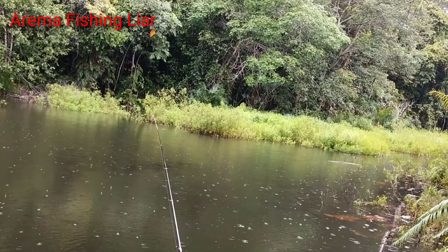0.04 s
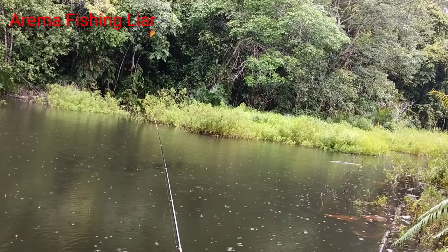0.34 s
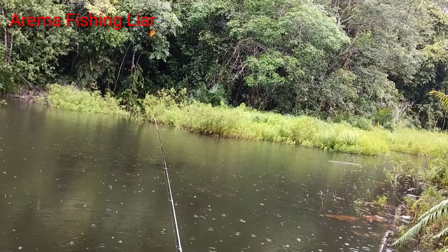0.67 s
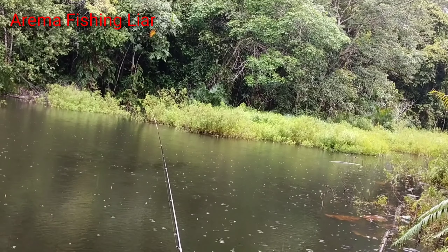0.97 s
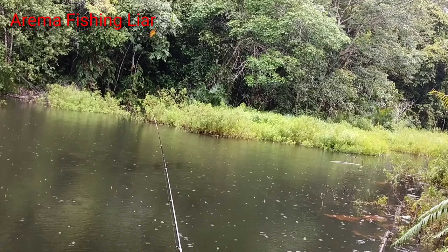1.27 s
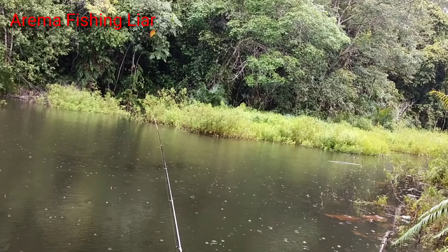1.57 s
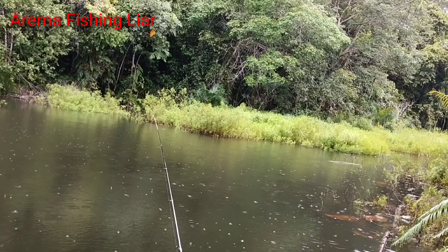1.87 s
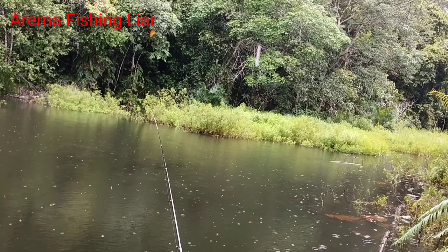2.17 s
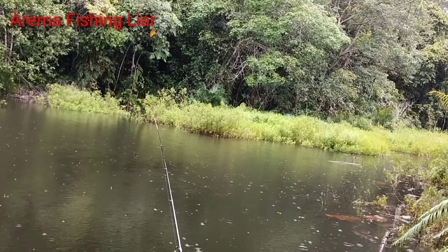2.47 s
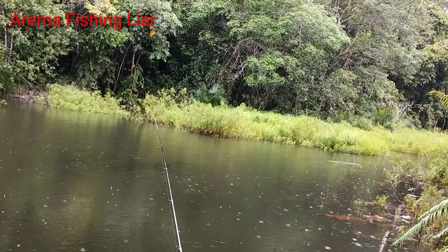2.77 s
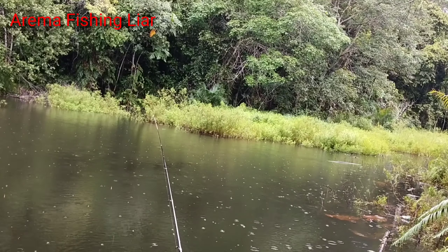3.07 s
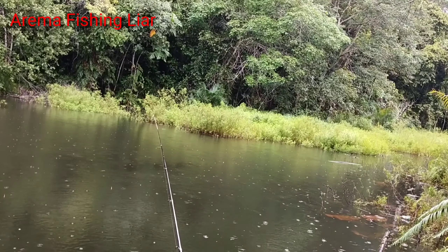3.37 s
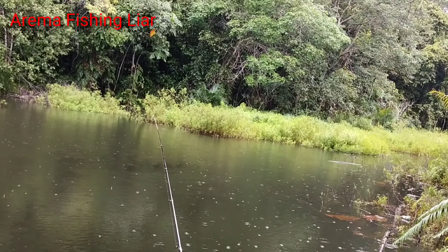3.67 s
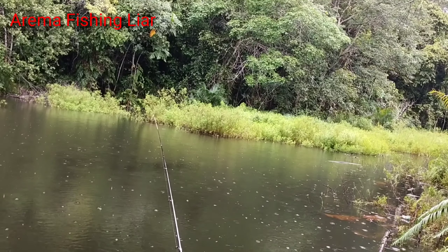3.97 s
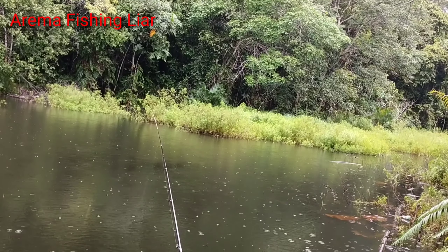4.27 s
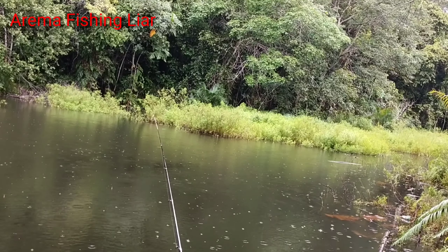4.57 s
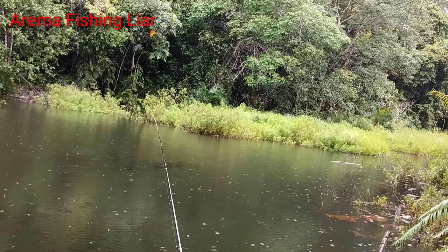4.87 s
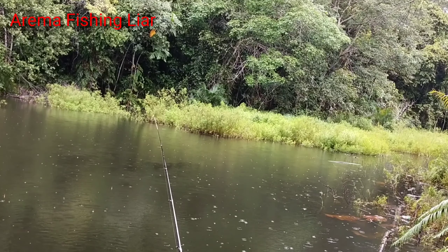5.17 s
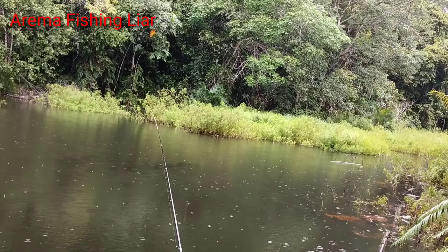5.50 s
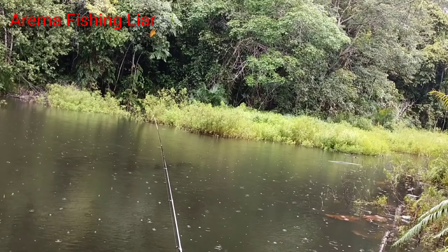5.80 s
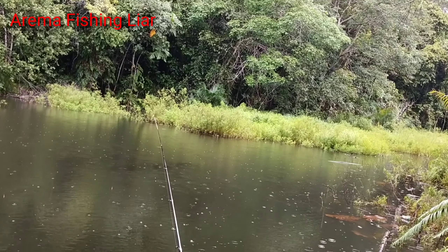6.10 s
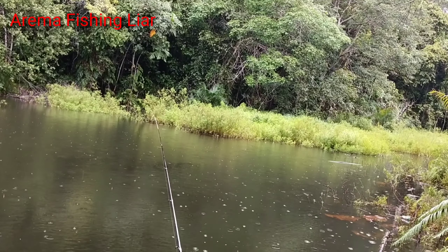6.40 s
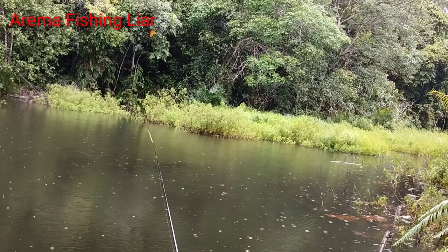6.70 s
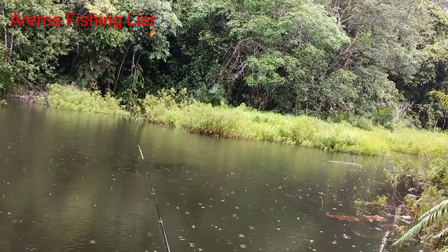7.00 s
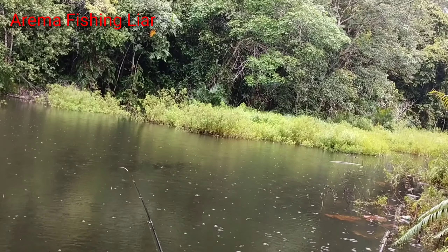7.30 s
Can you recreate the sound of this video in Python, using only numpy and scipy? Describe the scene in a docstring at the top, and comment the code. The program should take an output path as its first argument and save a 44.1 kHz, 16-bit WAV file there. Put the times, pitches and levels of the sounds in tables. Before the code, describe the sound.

A faint, steady hiss of drizzle on a forest pond and leaves runs throughout, sprinkled with tiny droplet ticks. Close above, larger drops hit a taut fabric canopy at uneven intervals, each making a sharp snap with a short, hollow thump and a quickly damped ring. One loud drop lands at about 0.1 seconds, followed by a faint plip in the water and a softer tap at 0.6 seconds. After a quieter stretch, a quick cluster of heavy drops strikes around 2 to 2.2 seconds, with another at 2.6 and several lighter taps up to 3.1. A faint bubbly plip comes near 3.3 seconds, just before two strong, deeper thumps at about 3.4 and 3.7. From 4 seconds to the end at around 7.5, only lighter taps and fine spattering ticks continue, with one modest thump near 5.5 seconds.

```python
"""Beside a forest pond, under a taut canopy in light rain.
Heavy drops strike the fabric at uneven intervals: each impact snaps, the struck panel thumps, and the
membrane rings in its damped modes. Small droplets burst in fine ticks, and a few drops trap resonating
bubbles in the pond. Drizzle on water and leaves sums to a faint, steady hiss."""
import sys
import numpy as np
from scipy import signal
from scipy.fft import rfft, irfft, next_fast_len
from scipy.io import wavfile
from scipy.ndimage import map_coordinates

SR = 44100
rng = np.random.default_rng(int(sys.argv[2]) if len(sys.argv) > 2 else 0)


def materialize(psi):
    """Save the field psi as 16-bit PCM at rate SR to the path in sys.argv[1].

    A 1-D psi becomes a single channel; in a 2-D psi each row is a channel.
    """
    bounded = np.clip(np.atleast_2d(psi).T, -1, 1)
    quanta = np.round(bounded * 32767).astype(np.int16)
    wavfile.write(sys.argv[1], SR, quanta)


N = 328541


def amp(db):
    """Amplitude ratio of a level in decibels."""
    return 10 ** (np.asarray(db) / 20)


def unit(x, size=None):
    """Normalisation to rms 1 over the first size samples."""
    return x / np.sqrt(np.mean(x[:size] ** 2) + 1e-20)


def along(points, hz):
    """Interpolation of (f/Hz, value) points on a logarithmic frequency axis."""
    f, value = np.transpose(points)
    return np.interp(np.log(hz + 1), np.log(f + 1), value)


def coloured(x, points):
    """Minimum-phase filtering by (f/Hz, level/dB) points: folding the cepstrum makes it causal."""
    m = 2 * next_fast_len(len(x))
    gain = amp(along(points, np.fft.rfftfreq(m, 1 / SR)))
    cepstrum = irfft(np.log(gain))
    cepstrum[1:m // 2] *= 2
    cepstrum[m // 2 + 1:] = 0
    return irfft(rfft(x, m) * np.exp(rfft(cepstrum)))[:len(x)]


def fade(t, t60):
    """Exponential decay of 60 dB in t60 seconds."""
    return np.exp(-np.log(1000) * t / t60)


def wobble(rate):
    """Spline interpolation of random knots, rate of them a second."""
    knots = rng.standard_normal(int(N * rate / SR) + 4)
    return map_coordinates(knots, [np.arange(N) * rate / SR])


def add(track, s, sound):
    """Superposition of a sound on the track at s seconds."""
    room = track[max(round(s * SR), 0):][:len(sound)]
    room += sound[:len(room)]


def play(events, voice):
    """Superposition of one voice per row: its onset time, then its arguments."""
    track = np.zeros(N)
    for s, *settings in events:
        add(track, s, voice(*settings))
    return track


# strength of the far rain: t/s, level/dB
RAIN_STRENGTH = [(0.0, -53.5), (0.35, -56), (2.53, -54.5), (2.7, -55), (4.01, -56.5), (4.29, -54.5),
                 (4.9, -57), (5.44, -54), (5.83, -56), (6.12, -53.5), (6.54, -57), (7.45, -54.5)]
def rain_level():
    """Slow amplitude modulation: the rain's mean level and its swell about that mean, in dB."""
    s, db = np.transpose(RAIN_STRENGTH)
    return db.mean(), np.interp(np.arange(N) / SR, s, db) - db.mean()


# spectral density of the rain's soft rush: f/Hz, relative level/dB
RUSH_SPECTRUM = [(25, -11), (55, -20), (90, -2.5), (130, -2), (400, -1), (1200, -1.5), (2300, -3.5),
                 (3000, -8), (3500, -10), (4000, -19.5), (7000, -21), (12000, -36.5)]
# spectral density of its thin fizz: f/Hz, relative level/dB
FIZZ_SPECTRUM = [(1500, -32), (4500, -2.5), (6500, -13), (7500, 2.5), (7950, 1), (8400, 8.5), (9500, -2),
                 (11500, -9), (13500, -4.5), (15400, 3)]
def drizzle(flutters_per_s=22):
    """Incoherent summation: fine rain on pond and forest merges into two bands of noise."""
    mean_db, swell_db = rain_level()
    rush = unit(coloured(rng.standard_normal(N), RUSH_SPECTRUM))
    rush *= amp(0.84 + swell_db + 1.1 * wobble(flutters_per_s))
    fizz = unit(coloured(rng.standard_normal(N), FIZZ_SPECTRUM))
    fizz *= amp(-7 + 0.9 * swell_db + 0.55 * wobble(flutters_per_s))
    return amp(mean_db) * (rush + fizz)


# spectrum of the finest droplets, nearly all treble: f/Hz, relative level/dB
MIST_SPECTRUM = [(500, -27), (3000, -8), (6000, 2.5), (8300, 6.5), (10000, -2), (13000, 5), (15500, -4.5)]
def patter(tap_count=20, tick_count=48, mist_count=130, crowding=2.2):
    """A random point process: faint droplets land at a rate that is a power of the rain's strength."""
    track = np.zeros(N)
    _, swell_db = rain_level()
    fallen = np.cumsum(amp(crowding * swell_db))
    landing_s = lambda share: np.searchsorted(fallen, share * fallen[-1]) / SR
    for share, size, pitch in rng.random((tap_count, 3)):
        db = -55.5 - size
        add(track, landing_s(share), tap(db, 1100 + 1100 * pitch, db - 11, thump_hz=550))
    droplets = (tick_count, -60, 9.5, SPRAY_SPECTRUM), (mist_count, -67.5, 11.5, MIST_SPECTRUM)
    for count, weakest_db, range_db, spectrum in droplets:
        for share, size in rng.random((count, 2)):
            add(track, landing_s(share), tick(weakest_db + range_db * size ** 2, spectrum))
    return track


def plip(db, pitch_hz):
    """Bubble resonance: trapped air rings and rises in pitch over a splash; small bubbles die sooner."""
    t = np.arange(SR // 12) / SR
    t60 = 0.055 * np.sqrt(600 / pitch_hz)
    phase = 2 * np.pi * pitch_hz * t * (1 + 0.25 * t / t60)
    bubble = unit(np.sin(phase) * fade(t, t60) * (1 - np.exp(-t / 0.00064)), size=SR // 100)
    splash = unit(coloured(rng.standard_normal(len(t)), RUSH_SPECTRUM) * fade(t, 0.39), size=SR // 100)
    return amp(db) * (bubble + amp(-7.5) * splash)


# bubbles in the pond: t/s, level/dB, starting f/Hz
BUBBLES = [(.264, -46, 550), (3.255, -51.5, 2350), (3.295, -46.5, 570)]
def pond_drops():
    """Air entrainment: a few drops each trap a bubble in the water."""
    return play(BUBBLES, plip)


# spectrum of spray: f/Hz, relative level/dB
SPRAY_SPECTRUM = [(200, -34), (1000, 3.5), (2800, 3), (4500, -4.5), (6800, -5), (8300, 6.5), (10000, -5),
                  (13000, -10.5), (15500, -0.5)]
def tick(db, spectrum=SPRAY_SPECTRUM):
    """Atomisation: a droplet bursts into a few milliseconds of spiky spatter with a short tail."""
    t = np.arange(SR // 16) / SR
    burst = (1 - np.exp(-t / 0.00069)) * (fade(t, 0.024) + 0.12 * fade(t, 0.14))
    spatter = rng.standard_normal(len(t)) * amp(10.1 * rng.standard_normal(len(t)))
    return amp(db) * unit(coloured(spatter * burst, spectrum), size=SR // 125)


# distinct droplets bursting into spray: t/s, level/dB
BURSTS = [(0.805, -40.5), (1.191, -49), (1.53, -48.5), (1.902, -49.5), (1.9872, -38), (2.4426, -46.5),
          (2.9233, -44), (3.1628, -52.5), (3.2553, -45.5), (3.621, -49.5), (4.0942, -44.5), (4.108, -37.5),
          (4.2323, -46.5), (4.379, -53.5), (4.4454, -47.5), (5.1156, -45), (5.2564, -44), (5.3588, -52),
          (6.0408, -52), (6.0915, -44.5), (6.1217, -52), (6.411, -52), (6.9238, -49.5), (7.025, -50),
          (7.0767, -42.5), (7.1737, -47.5)]
def bursting_droplets():
    """Broadband transients: each near droplet is heard as a separate tick."""
    return play(BURSTS, tick)


# spectrum of the ripples in the fabric: f/Hz, relative level/dB
RIPPLE_SPECTRUM = [(80, -24.5), (200, 7), (400, 3), (1000, 5.5), (2000, -0.5), (3200, -9), (4500, -21),
                   (6800, -22), (8200, -11.5), (10500, -41), (16000, -43)]
# their decay time: f/Hz, t60/s
RIPPLE_T60 = [(150, 0.26), (500, 0.16), (1200, 0.069), (4000, 0.06), (10000, 0.06)]
def ripples(t):
    """Multiple scattering: waves turned back by ribs and hem form a dense tail whose treble dies first."""
    hz, age, spectra = signal.stft(rng.standard_normal(len(t)), SR, nperseg=128)
    damping = fade(age, along(RIPPLE_T60, hz)[:, None])
    tail = signal.istft(spectra * damping, SR, nperseg=128)[1][:len(t)]
    return unit(coloured(tail, RIPPLE_SPECTRUM) * (1 - np.exp(-t / 0.00022)), size=SR // 100)


# low modes of the stretched fabric: f/Hz, relative level/dB, t60/s
MEMBRANE_MODES = [(102.1, -7.5, 0.25), (131, -1.5, 0.21), (158.3, 6, 0.071), (187.7, -14.5, 0.29),
                  (235.4, -1.5, 0.14), (310.4, -5, 0.19), (383.3, -3, 0.16), (499.4, -12.5, 0.13),
                  (621, -2.5, 0.11)]
def ring(thump_hz, t):
    """Normal modes of a membrane: a blow on a tight spot favours the higher, on a slack one the lowest."""
    tilt = 1.3 * np.log(thump_hz / 350)
    hum = np.zeros(len(t))
    scatter = rng.standard_normal((len(MEMBRANE_MODES), 3))
    for (hz, db, t60), (size, detune, sign) in zip(MEMBRANE_MODES, scatter):
        drift = np.cumsum(rng.normal(0, 0.027, len(t)))  # wet cloth never holds a pure pitch
        phase = 2 * np.pi * hz * (1 + 0.024 * detune) * t + drift
        weight = np.sign(sign) * amp(db + 4.3 * size) * hz ** tilt
        hum += weight * np.sin(phase) * fade(t, t60)
    return unit(hum * (1 - np.exp(-t / 0.0022)), size=SR // 20)


# colouring of the impact pulse: f/Hz, relative level/dB
SNAP_SPECTRUM = [(100, -1.5), (500, 6), (1500, 3.5), (3200, 6), (4200, -12), (6500, -1), (8200, 5),
                 (11000, -10), (15000, -7)]
def snap(pitch_hz, t):
    """Impact radiation: one push and pull of pressure, shorter for a small drop, then tock and ripples."""
    cycles = pitch_hz * t
    pulse = coloured(np.sin(2 * np.pi * cycles) * np.exp(-2.4 * cycles), SNAP_SPECTRUM)
    blow = pulse.copy()
    for delay_s, sign in zip(rng.uniform(0.00118, 0.006, 3), rng.choice([-1, 1], 3)):
        add(blow, delay_s, 0.31 * sign * pulse)  # reflections from the nearest ribs
    spot_hz = rng.uniform(687, 3430, (4, 1))  # quick resonances of the struck spot
    spot_modes = np.sin(2 * np.pi * spot_hz * t) / (1 + (spot_hz / pitch_hz) ** 2)
    tock = spot_modes.sum(axis=0) * fade(t, 0.023)
    return unit(blow, size=SR // 125) + amp(-4) * unit(tock, size=SR // 125) + amp(-5) * ripples(t)


def thump(nominal_hz, t):
    """Damped oscillation: the struck panel swings a few times, sinking in pitch as it relaxes."""
    cycles = np.cumsum(nominal_hz * (0.87 + 0.61 * np.exp(-t / 0.0013))) / SR
    attack = (1 - np.exp(-t / 0.00021)) ** 2
    return unit(np.cos(2 * np.pi * cycles) * np.exp(-0.85 * cycles) * attack, size=SR // 50)


def tap(snap_db, snap_hz, thump_db, thump_hz):
    """Impulse response of the canopy to one drop: snap, thump and ring, with a tick of spray."""
    t = np.arange(SR // 3) / SR
    sound = amp(snap_db) * snap(snap_hz, t)
    sound += amp(thump_db - 2) * thump(thump_hz, t)
    sound += amp(thump_db - 9.5) * ring(thump_hz, t)
    add(sound, 0.0005, tick(snap_db - 16.5))  # the drop shatters just after it lands
    return sound


# drops on the canopy, nominal values: t/s, snap level/dB, snap f/Hz, thump level/dB, thump f/Hz
IMPACTS = [(0.0362, -51.5, 2130, -60, 540), (0.1074, -23.5, 1000, -21, 344), (0.6312, -38, 1100, -40, 404),
           (0.8366, -44.5, 1340, -52, 540), (1.1373, -52.5, 1870, -68, 540), (1.191, -49.5, 915, -55, 516),
           (1.53, -51, 2200, -74, 380), (1.9862, -29, 1740, -56.5, 520), (2.0059, -26, 1600, -23.5, 320),
           (2.018, -44, 880, -57, 408), (2.0535, -39, 1950, -29.5, 239), (2.1485, -44.5, 1200, -49, 450),
           (2.1628, -26.5, 770, -23.5, 327), (2.442, -53, 2040, -52, 500), (2.5583, -27, 1100, -28.5, 385),
           (2.6269, -36, 1270, -44, 407), (2.6886, -40.5, 624, -33.5, 308), (2.765, -47.5, 1010, -68, 420),
           (2.8427, -47, 1940, -47, 290), (2.9028, -38.5, 980, -46, 493), (2.9219, -41.5, 1580, -45.5, 526),
           (2.9859, -48.5, 1830, -80, 400), (3.092, -35.5, 1040, -32, 348),
           (3.3524, -24.5, 1050, -17.5, 292), (3.6649, -30.5, 1090, -24, 245),
           (3.7578, -48.5, 1660, -53, 344), (3.9163, -49.5, 770, -55.5, 450),
           (4.1502, -43.5, 1800, -39.5, 318), (4.4459, -49.5, 1540, -55, 476),
           (4.6623, -46, 2200, -77, 400), (5.024, -41.5, 1510, -47, 440), (5.1999, -49.5, 2010, -54, 475),
           (5.2946, -46.5, 1730, -73, 496), (5.3591, -45.5, 1760, -50.5, 460),
           (5.4884, -43, 1410, -32, 284), (5.9169, -53.5, 1780, -43.5, 290),
           (5.9408, -50, 1050, -49.5, 396), (6.0851, -43, 2040, -72, 370), (6.305, -54, 1820, -69, 447),
           (6.4755, -49.5, 1060, -72, 423), (7.3995, -43, 1030, -70, 440)]
def canopy_drops():
    """Impact excitation of a membrane: the thump is higher where the tension is greater."""
    return play(IMPACTS, tap)


def scene():
    """Linear superposition of the near drops and the far rain, in one channel."""
    return (canopy_drops() + bursting_droplets() + pond_drops() + patter() + drizzle())[None]


def record(dry, bass_hz=85, top_hz=15700):
    """Band limiting: the deep bass rolls off and the highest treble is cut sharply."""
    thin = signal.sosfilt(signal.butter(3, bass_hz, "highpass", fs=SR, output="sos"), dry)
    m = next_fast_len(N + SR // 2)
    passband = np.fft.rfftfreq(m, 1 / SR) < top_hz
    return irfft(rfft(thin, m) * passband, m)[..., :N]


dry = scene()
out = record(dry)
materialize(out)
```